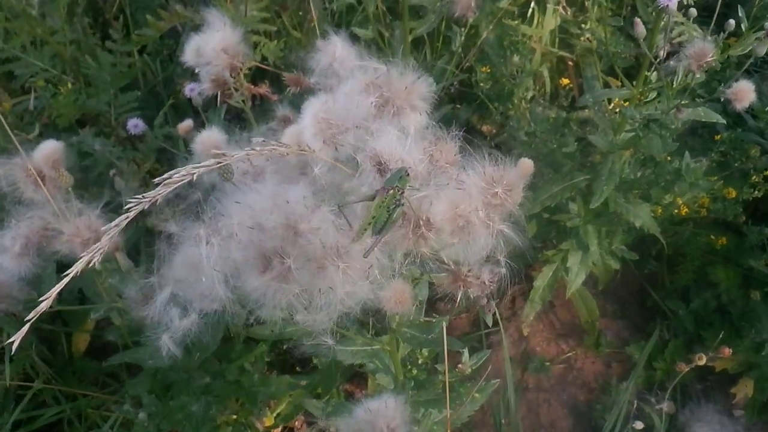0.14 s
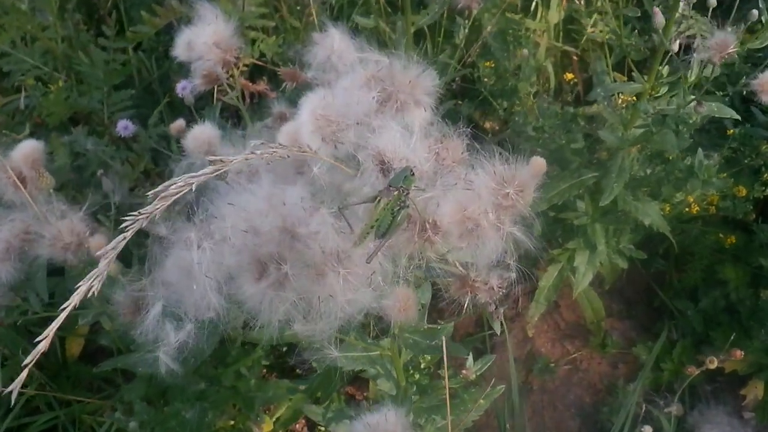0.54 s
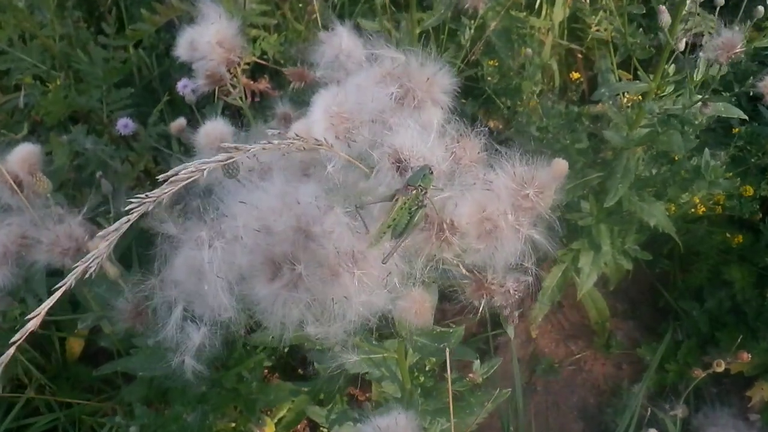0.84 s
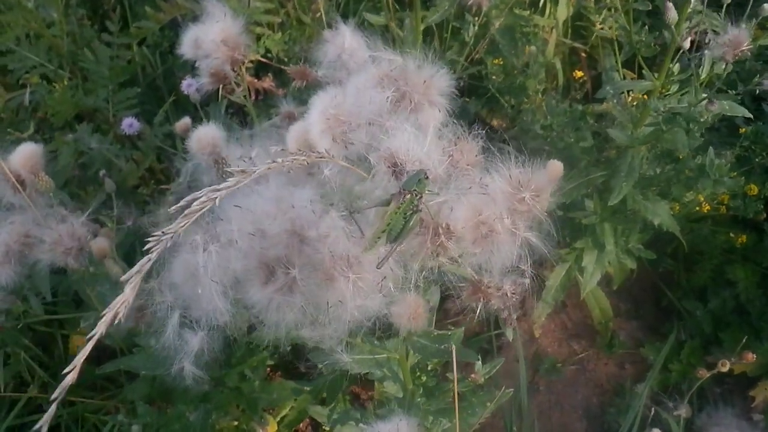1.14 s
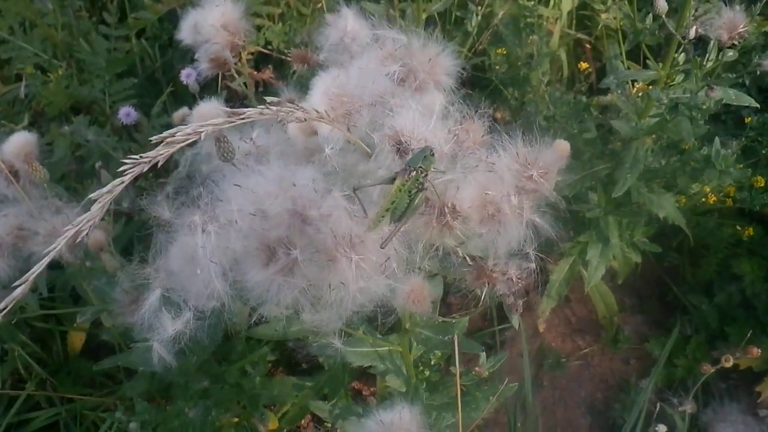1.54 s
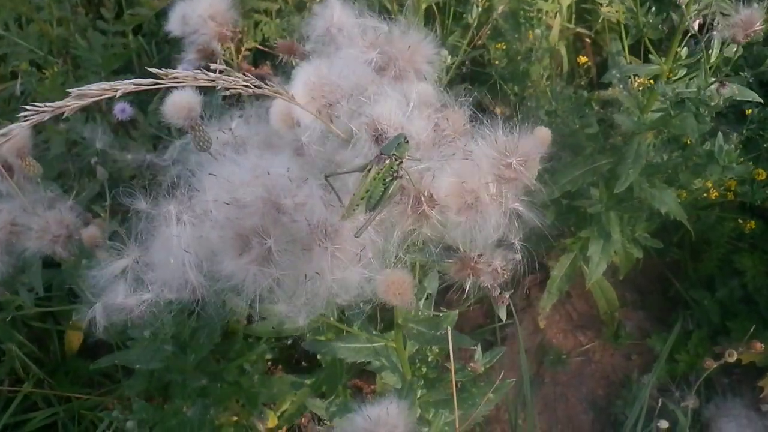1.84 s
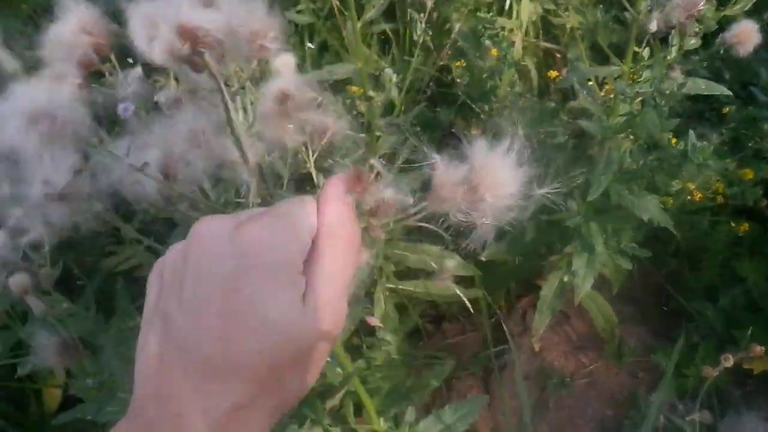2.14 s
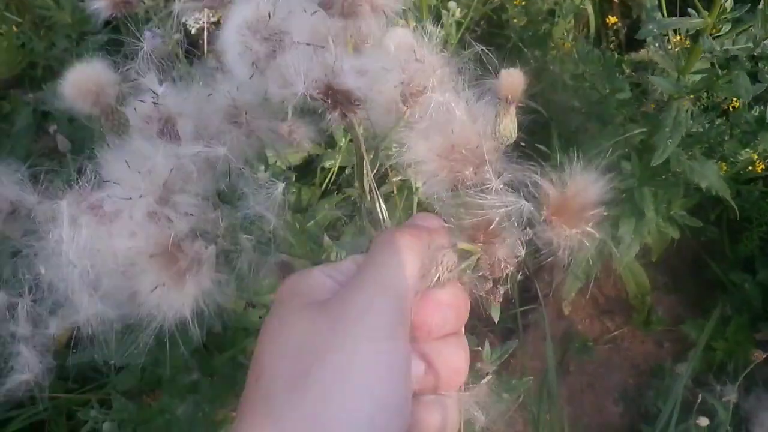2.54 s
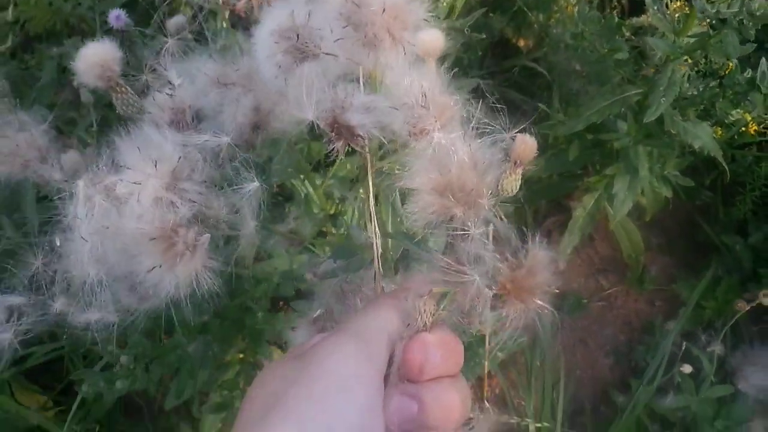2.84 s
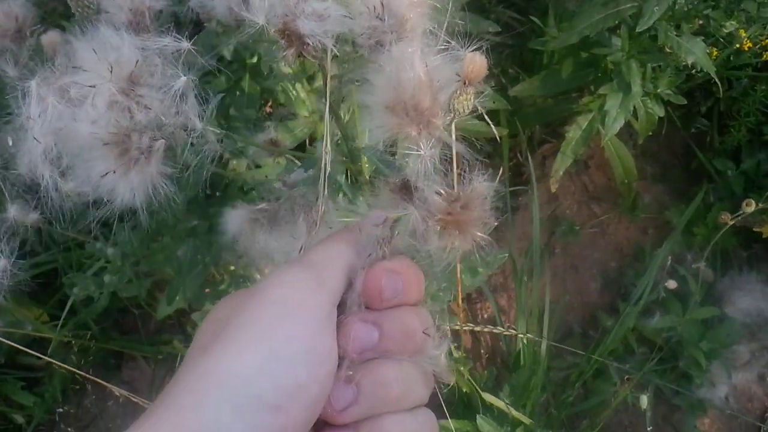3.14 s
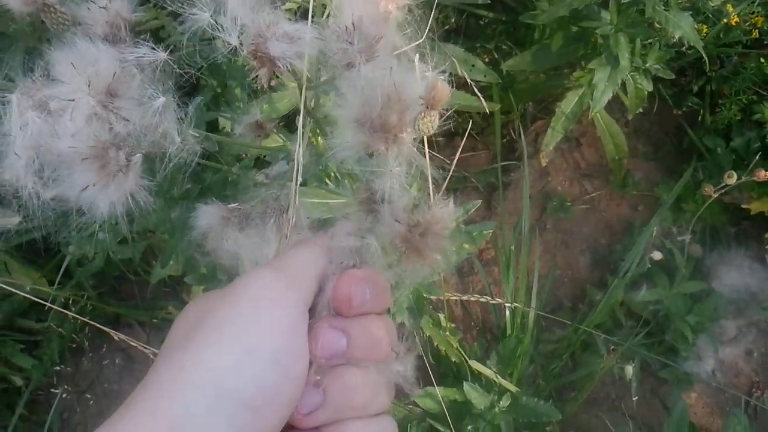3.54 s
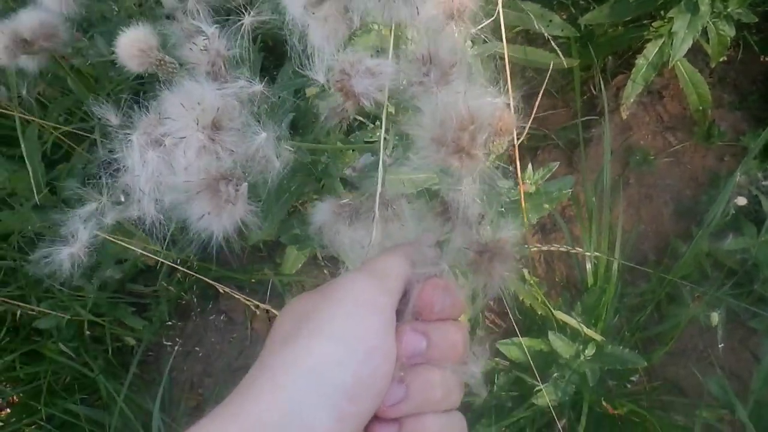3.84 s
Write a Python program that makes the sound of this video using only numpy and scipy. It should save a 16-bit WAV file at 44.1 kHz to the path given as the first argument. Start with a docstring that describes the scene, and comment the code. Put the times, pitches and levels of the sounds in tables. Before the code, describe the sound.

A bush-cricket chirps in rapid high pulses, stops as plants rustle, then microphone handling knocks follow.

```python
"""Outdoors at a thistle, microphone close to the plant, a soft rush and hiss behind.
A bush-cricket on the down chirps nine times a second, drawing scraper over file tooth by tooth.
A hand brushes through and the insect falls silent; fibres crackle, stems tick as they are gripped.
Low buffeting reaches the microphone. Then, right at it, the camera is handled: its case clicks
and thumps, and each loud click ducks the automatic gain."""
import sys
import numpy as np
from scipy import signal
from scipy.fft import rfft, irfft
from scipy.io import wavfile
from scipy.ndimage import uniform_filter1d, minimum_filter1d

SR = 44100
rng = np.random.default_rng(int(sys.argv[2]) if len(sys.argv) > 2 else 0)


def file_out(sig):
    """Save sig as 16-bit WAV at sys.argv[1]."""
    # one column per channel
    cols = np.atleast_2d(sig).T
    # limit, then scale
    lim = np.clip(cols, -1, 1)
    pcm = np.round(lim * 32767).astype(np.int16)
    wavfile.write(sys.argv[1], SR, pcm)


N = 176400
T = np.arange(N) / SR

# Colours of the distant rush and the thin hiss: f/Hz, relative level/dB
RUSH_COLOUR = [(18, -36.5), (30, -17), (81, 3), (157, -6.5), (197, -1.5), (332, -2), (372, -2.5), (788, -3),
               (1180, -5), (1300, -8), (1420, -5), (1780, -9), (2390, -9.5), (2870, 0), (4420, -14.5),
               (5800, -11.5), (6800, -21), (8840, -32), (15000, -120)]
HISS_COLOUR = [(4000, -18.5), (7000, -1), (10000, 1.5), (15800, 1)]
# Buffeting on the microphone, and the case rumbling as the grip shifts: t/s, level/dB
BUFFET_CURVE = [(1.14, -81), (1.19, -47.5), (1.215, -44.5), (1.23, -58), (1.248, -37), (1.27, -63),
                (1.295, -37.5), (1.315, -65), (1.335, -45), (1.39, -89), (1.78, -72), (1.9, -57),
                (2.18, -53), (2.25, -63), (2.5, -55.5), (2.65, -45.5), (2.72, -60), (2.78, -44),
                (2.85, -54.5), (2.9, -43), (3.01, -44.5), (3.06, -62.5), (3.55, -72)]
GRIP_CURVE = [(3.58, -51), (3.66, -45), (3.685, -19), (3.73, -24.5), (3.78, -35.5), (3.805, -16.5),
              (3.865, -19), (3.895, -36), (4.0, -65)]
# Fingers sliding on the case: t/s, length/s, level/dB, fade/dB
FINGER_SLIDES = [(3.626, 0.061, -26, 6), (3.688, 0.034, -36.5, 11), (3.797, 0.13, -37.5, 13.5)]
# Colours of buffeting, grip and sliding fingers: f/Hz, relative level/dB
BUFFET_COLOUR = [(25, -14.5), (60, -2.5), (100, 3), (165, 3), (250, -10.5), (380, -21.5), (800, -42.5),
                 (8000, -100)]
GRIP_RUMBLE_COLOUR = [(25, -16.5), (60, -6), (110, -4), (150, 6), (240, -8), (400, -8), (800, -22),
                      (2000, -55.5), (12000, -100)]
FINGER_COLOUR = [(100, -11.5), (280, -2.5), (430, 2.5), (650, 1.5), (850, -1), (1400, -1.5), (2200, -9.5),
                 (3000, -13.5), (4000, -25.5), (5500, -21), (8000, -39), (15000, -63.5)]
# Contacts on the case: t/s, thud f/Hz, ring f/Hz, ring gain/dB,
# then level/dB, before weighting, of the thud and of the four bands above it
CASE_CONTACTS = [(2.982, 550, 2750, 17.5, -3.5, -10, -19, -8.5, -15.5),
                 (3.5474, 250, 300, -14, -30.5, -38, -50, -70, -76),
                 (3.5885, 300, 900, -9, -33.5, -48, -50, -70, -71.5),
                 (3.6204, 300, 890, -1, -39, -33, -35, -67.5, -71),
                 (3.626, 450, 590, -1, -15.5, -33.5, -42, -64, -74),
                 (3.6813, 220, 7620, 11, -1.5, -6.5, -9, -7, -15.5),
                 (3.7163, 250, 4960, 10.5, -10, -24, -29, -37, -57),
                 (3.7675, 150, 5300, 3, -23, -49, -51, -48, -58),
                 (3.821, 250, 900, 1, -23, -38, -48, -63, -68),
                 (3.9366, 120, 1400, 9.5, -9.5, -13.5, -10, -9.5, -13)]
# Those four bands, low middle to top: f/Hz
CONTACT_BANDS = [1200, 3000, 6700, 12500]
# Modes of the case: f/Hz, gain/dB, t60/s
CASE_MODES = [(151, -51, 0.03), (944, -33, 0.021), (2100, -50.5, 0.064), (3870, -35, 0.015),
              (3950, -31.5, 0.014), (4285, -53.5, .046), (5260, -36, 0.011), (6492, -70.5, .12),
              (7100, -63, 0.074), (8240, -48.5, .018)]
# The hand brushing the plant, and a stem scraping through the fingers: t/s, level/dB
BRUSH_CURVE = [(1.98, -58.5), (2.05, -47), (2.085, -38), (2.1, -31.5), (2.125, -42), (2.2, -43.5),
               (2.29, -48), (2.37, -56.5), (2.42, -53.5), (2.48, -58), (2.66, -52.5), (2.712, -44),
               (2.745, -54), (2.95, -52), (2.968, -59), (2.98, -28.5), (3.0, -57), (3.08, -72), (3.15, -68)]
SCRAPE_CURVE = [(2.08, -75), (2.16, -44), (2.24, -48), (2.295, -48), (2.35, -64)]
# Colour of the crackling fibres: f/Hz, relative level/dB
FIBRE_COLOUR = [(120, -29), (250, -7.5), (600, -2.5), (1450, -3.5), (2000, -9), (3000, 1.5), (4200, -6.5),
                (5500, -5.5), (6800, -16.5), (8200, -21), (10000, -31.5), (15000, -41.5)]
# Ticks of gripped stems: t/s, level/dB, f/Hz, width/octaves, t60/s
TICKS = [(2.5245, -22.5, 1140, 0.47, 0.014), (2.5799, -17, 5110, 0.1, 0.004),
         (2.631, -13, 2080, 0.29, 0.033), (3.1283, 0, 2990, 0.16, 0.0068), (3.407, -16.5, 920, 0.45, 0.023),
         (3.522, -11, 4030, 0.46, 0.0034), (3.5301, -10, 2790, 0.17, 0.0067)]
# The cricket's chirps: t/s, relative level/dB
SONG = [(.0254, -1), (0.1305, -0.5), (0.2406, 0), (0.3509, 0), (.4624, 0.5), (.5717, 0.5), (.684, 0.5),
        (.791, 0), (.893, 0.5), (0.999, 0.5), (1.1112, 0.5), (1.2208, 1), (1.3264, 1.2), (1.4366, 1),
        (1.5496, 1.5), (1.657, 1.5), (1.766, 1), (1.8805, 1.3), (1.99, 1.5)]
# Wing strokes of every chirp: delay/s, length/s, relative end level/dB, swell/dB,
# first and last tooth rate/Hz, bright share at the end (0-1)
WING_STROKES = [(.0015, 0.0019, -7.5, 17.5, 4800, 3200, 0), (0.01, 0.0075, -12, 27, 3000, 3800, 0.4),
                (0.018, 0.0093, 1.5, 26, 4500, 1800, 0.68), (.033, .0007, -19, -9, 2100, 2500, 0),
                (.0415, .0075, 3.5, 26.5, 4500, 2200, 0.82), (.0503, .0012, -28.5, -6, 4000, 4000, 0),
                (0.0511, .0058, 6, 9.5, 3800, 1100, 0.84)]
# Colours of the wing under firm and light contact: f/Hz, relative level/dB
FIRM_COLOUR = [(2500, -41.5), (4500, -21.5), (5800, -8.5), (7000, -35), (7700, -3.5), (10400, 1.5),
               (11050, -2.5), (12100, 9.5), (12900, 6.5), (13600, 7), (15800, -2.5)]
LIGHT_COLOUR = [(2500, -40), (5000, -15.5), (7000, -8.5), (7800, -0.5), (9800, -6.5), (11100, -9),
                (12500, -17.5), (15800, -3)]
# Narrow dips in the microphone's response: f/Hz, width/Hz
MIC_NOTCHES = [(1780, 52), (3430, 85), (3570, 27), (3640, 93), (4285, 62), (4495, 100)]


def from_db(db):
    return 10 ** (np.asarray(db) / 20)


def unit_rms(x):
    return x / np.sqrt(np.mean(x ** 2) + 1e-20)


def envelope(curve):
    """Gain along a curve of t/s, level/dB; silent outside it."""
    return from_db(np.interp(T, *np.transpose(curve), left=-np.inf, right=-np.inf))


def response(points, size=4096):
    """Minimum-phase impulse response for a colour of f/Hz, level/dB."""
    hz, db = np.transpose(points)
    grid = np.maximum(np.fft.rfftfreq(size, 1 / SR), 1)
    cepstrum = irfft(np.log(from_db(np.interp(np.log(grid), np.log(hz), db))))
    cepstrum[1:size // 2] *= 2
    cepstrum[size // 2 + 1:] = 0
    return irfft(np.exp(rfft(cepstrum)))


def colour(x, points):
    """Filter by a colour of unit energy."""
    h = response(points)
    return signal.fftconvolve(x, h / np.linalg.norm(h))[:len(x)]


def noise(points):
    return colour(rng.standard_normal(N), points)


def poles(hz, width_hz):
    """Feedback coefficients of a damped resonator."""
    r = np.exp(-np.pi * width_hz / SR)
    return np.array([1, -2 * r * np.cos(2 * np.pi * hz / SR), r * r])


def resonance(x, hz, width_hz):
    """Band-pass with gain 1 at its centre."""
    a = poles(hz, width_hz)
    return signal.lfilter(np.array([1, 0, -1]) * (1 - a[2]) / 2, a, x + 1e-18)


def narrow_noise(hz, stage_width_hz):
    """Noise through two like band-passes, at unit RMS."""
    once = resonance(rng.standard_normal(N), hz, stage_width_hz)
    return unit_rms(resonance(once, hz, stage_width_hz))


def burst(t60, size=4096):
    """Dying noise of unit energy."""
    x = rng.standard_normal(size) * from_db(-60 * T[:size] / t60)
    return x / np.linalg.norm(x)


def ring(x, hz, t60):
    """A unit click sets a sine of height 1 ringing."""
    a = poles(hz, np.log(1000) / (np.pi * t60))
    return signal.lfilter([1, a[1] / 2], a, x + 1e-18)


def add(out, start, x):
    i = int(start * SR)
    out[i:i + len(x)] += x[:max(N - i, 0)]


def outdoors():
    """Far off, a steady rush with a narrow resonance in it, and a thin hiss."""
    rush = from_db(-53.5) * noise(RUSH_COLOUR)
    peak = from_db(-73) * narrow_noise(hz=2880, stage_width_hz=440)
    return rush + peak + from_db(-66) * noise(HISS_COLOUR)


def handling():
    """Right at the microphone: buffeting, the shifting grip and fingers rubbing over the case."""
    buffeting = envelope(BUFFET_CURVE) * noise(BUFFET_COLOUR)
    grip = envelope(GRIP_CURVE) * noise(GRIP_RUMBLE_COLOUR)
    pressure = np.zeros(N)
    for start, length, db, fade_db in FINGER_SLIDES:
        add(pressure, start, from_db(db - np.linspace(0, fade_db, int(length * SR))))
    return buffeting + grip + uniform_filter1d(pressure, size=200) * noise(FINGER_COLOUR)


def case_knocks(mode_spread_db=5.5):
    """Each contact is a sharp push that rings, rattles and strikes the case's modes a little unevenly."""
    out = np.zeros(N)
    for start, thud_hz, ring_hz, ring_db, *bands_db in CASE_CONTACTS:
        # Narrow bands hold their energy more densely.
        density_db = np.array(bands_db) + [37.3, 33.2, 30.8, 30, 26.9]
        bands = zip([thud_hz, *CONTACT_BANDS], density_db)
        push = from_db(-4) * response([(30, density_db[0] - 10), *bands, (16500, density_db[-1] - 9)])
        push += from_db(ring_db) * resonance(push, ring_hz, width_hz=400)
        push += from_db(-6) * signal.fftconvolve(push, burst(t60=.006))[:len(push)]  # rattle
        modes = sum(from_db(db + mode_spread_db * rng.standard_normal()) * ring(push, hz, t60)
                    for hz, db, t60 in CASE_MODES)
        add(out, start, push + modes)
    # The shell smears each knock over a millisecond: a chain of all-passes.
    for hz, width_hz in [(1800, 1460), (4400, 2100), (7000, 6200), (10500, 6900)]:
        a = poles(hz, width_hz)
        out = signal.lfilter(a[::-1], a, out)
    return out


def plant(fibres_per_s=14000, spread_db=2):
    """Close by, fine fibres crackle against the hand, one stem scrapes and single stems tick."""
    snaps = (rng.random(N) < fibres_per_s / SR) * rng.choice([-1, 1], N)
    strength = from_db(spread_db * np.minimum(rng.exponential(1, N), 4))
    out = envelope(BRUSH_CURVE) * unit_rms(colour(snaps * strength, FIBRE_COLOUR))
    out += envelope(SCRAPE_CURVE) * narrow_noise(hz=1440, stage_width_hz=600)
    grid_hz = np.geomspace(50, 20000, 60)
    for start, db, hz, octaves, t60 in TICKS:
        hump_db = -17 * np.log10(1 + 2 * (np.log2(grid_hz / hz) / octaves) ** 2)
        add(out, start, from_db(db) * colour(burst(t60), np.transpose([grid_hz, hump_db])))
    return out


def cricket(max_teeth=40, gap_jitter=.16, tooth_spread_db=1.8, stroke_jitter_s=.0003):
    """Each tooth of the file clicks the wing; the loud strokes slow, press harder and brighten."""
    bright, dull = np.zeros(N), np.zeros(N)
    grid = np.linspace(0, 1, max_teeth)
    for start, chirp_db in SONG:
        for delay, length, db, swell_db, first_rate, last_rate, share in WING_STROKES:
            gaps, sizes, shift = rng.standard_normal((3, max_teeth))
            teeth = np.cumsum(np.maximum(1 + gap_jitter * gaps, .1)) - 1  # places along the file
            travel = length * (first_rate * grid + (last_rate - first_rate) * grid ** 2 / 2)
            struck = teeth <= travel[-1]
            progress = np.interp(teeth[struck], travel, grid)  # 0-1 through the stroke
            onset = start + delay + stroke_jitter_s * shift[0]
            at = ((onset + progress * length) * SR).astype(int)
            pressure_db = -swell_db * (1 - progress) ** 2
            force = from_db(chirp_db + db + pressure_db + tooth_spread_db * sizes[struck])
            firmness = np.clip(share * from_db(.6 * pressure_db), 0, 1)
            bright[at] += force * firmness
            dull[at] += force * (1 - firmness)
    add(dull, 2.0722, from_db([-2]))  # one last tick ends the song
    song = from_db(-21) * (colour(bright, FIRM_COLOUR) + colour(dull, LIGHT_COLOUR))
    leaf_scatter = from_db(-20) * signal.fftconvolve(song, burst(t60=.047))[:N]
    return song + leaf_scatter


def scene():
    """Everything that arrives at the one microphone."""
    return (cricket() + plant() + handling() + case_knocks() + outdoors())[None]


def record(dry, limit_db=-13, recovery_db_per_s=7.5, detector_s=.002, cutoff_hz=15900):
    """Microphone dips, a gain that ducks at once and recovers slowly, rounded peaks and a top cut."""
    x = dry[0]
    for hz, width_hz in MIC_NOTCHES:
        x = signal.lfilter(*signal.iirnotch(hz, hz / width_hz, fs=SR), x)
    span = int(detector_s * SR)
    level_db = 10 * np.log10(np.abs(uniform_filter1d(x * x, span)) + 1e-12)
    over_db = np.maximum(level_db - limit_db, 0)
    duck_db = np.maximum.accumulate(over_db + recovery_db_per_s * T) - recovery_db_per_s * T
    gain_db = uniform_filter1d(minimum_filter1d(-duck_db, 2 * span), span)
    rounded = np.tanh(x * from_db(gain_db))
    top_cut = signal.ellip(10, .2, 70, cutoff_hz, fs=SR, output="sos")
    return signal.sosfilt(top_cut, rounded)[None]


dry = scene()
out = record(dry)
file_out(out)
```